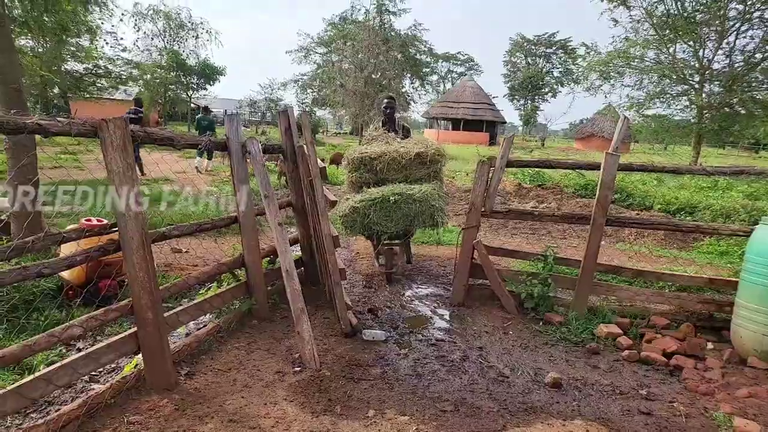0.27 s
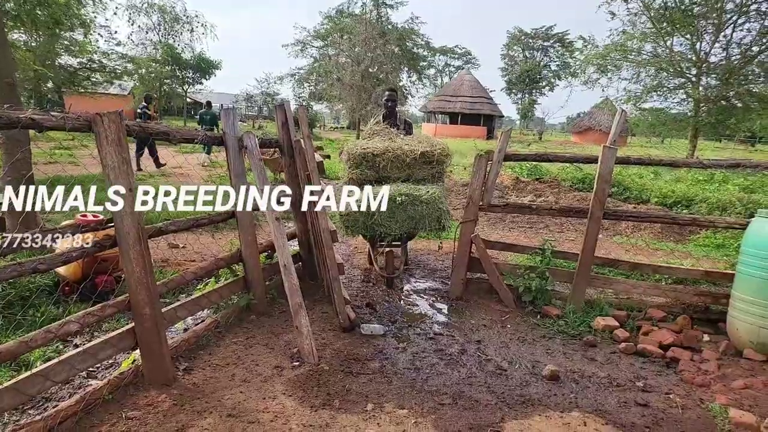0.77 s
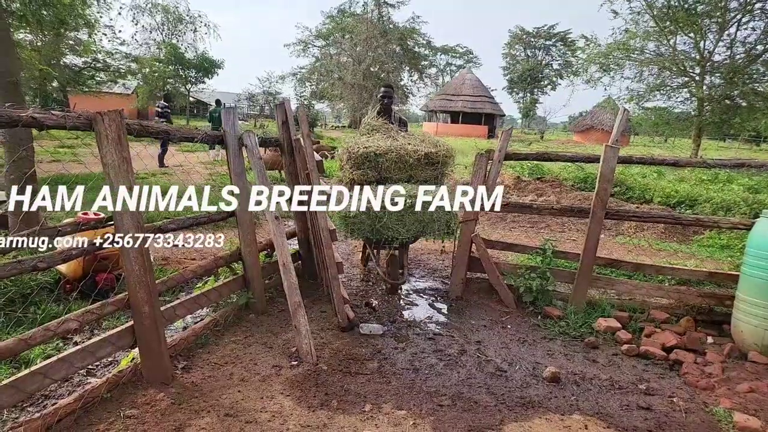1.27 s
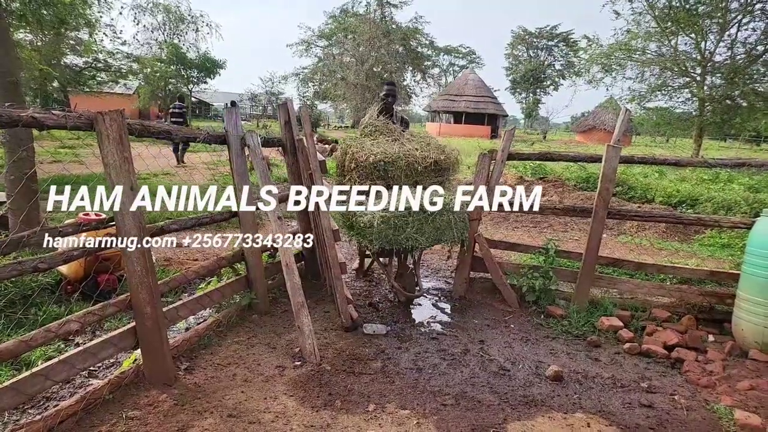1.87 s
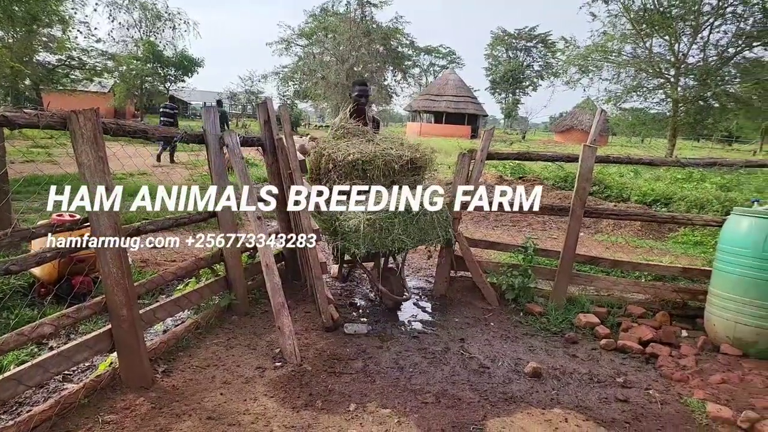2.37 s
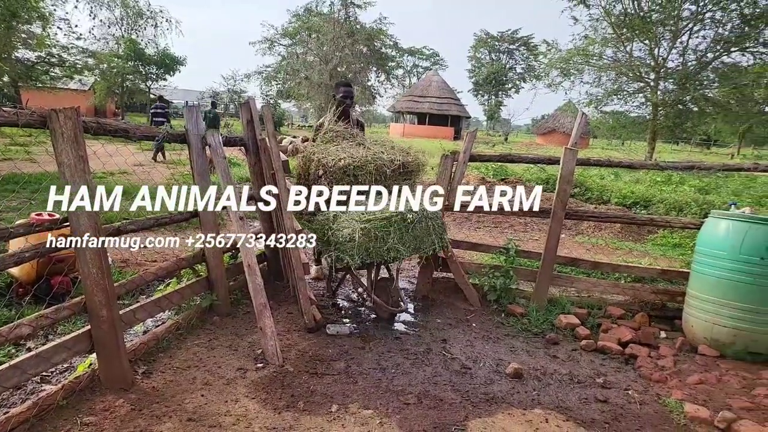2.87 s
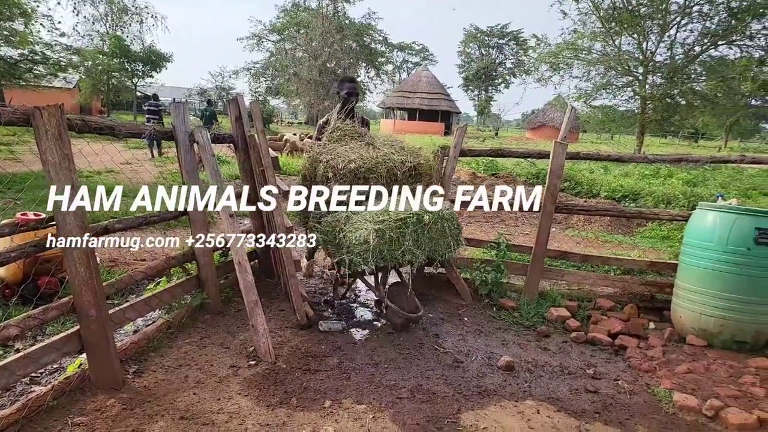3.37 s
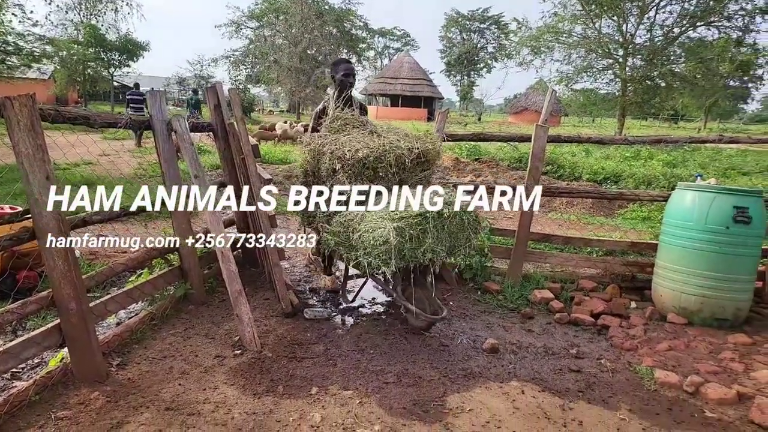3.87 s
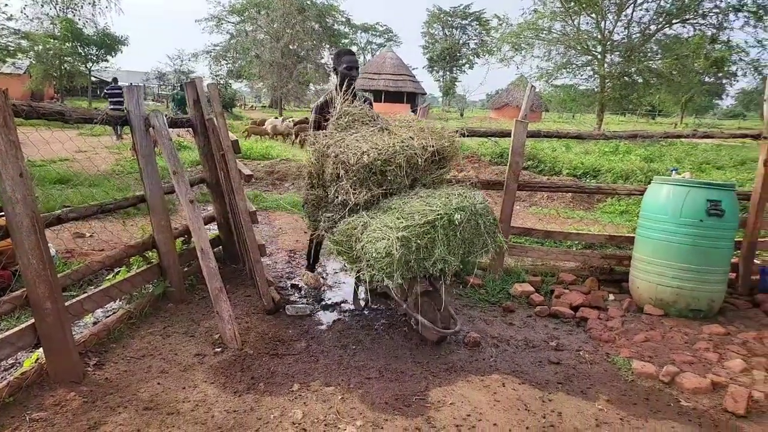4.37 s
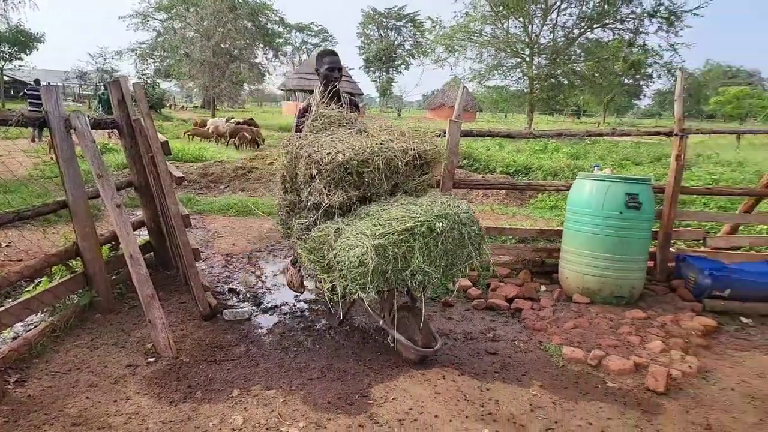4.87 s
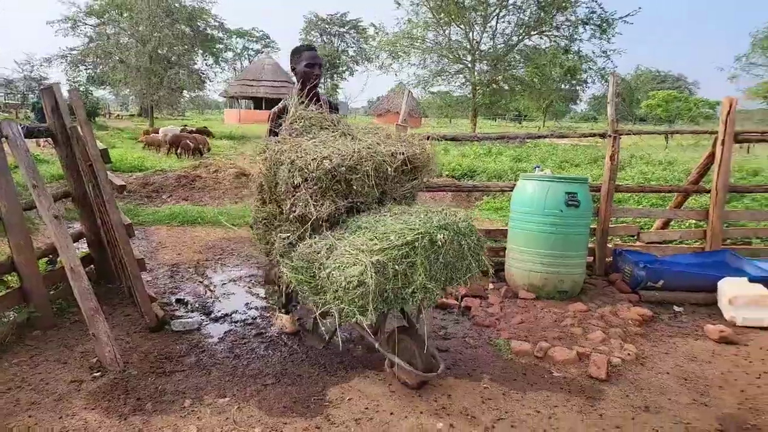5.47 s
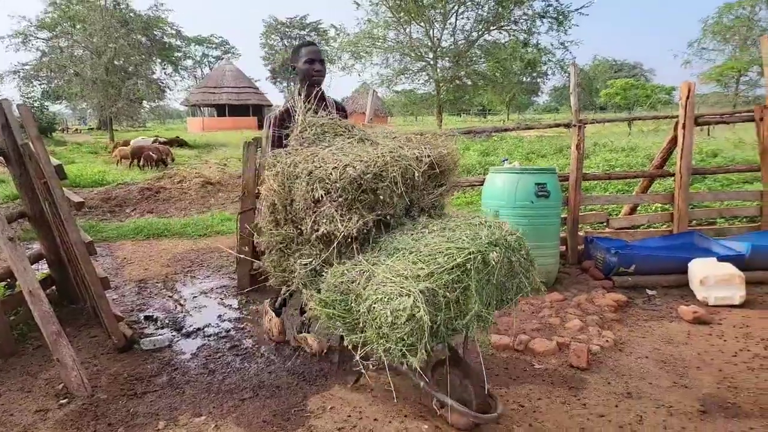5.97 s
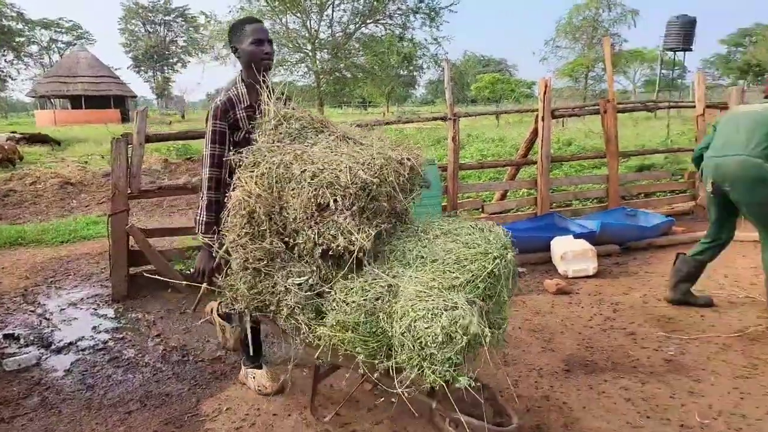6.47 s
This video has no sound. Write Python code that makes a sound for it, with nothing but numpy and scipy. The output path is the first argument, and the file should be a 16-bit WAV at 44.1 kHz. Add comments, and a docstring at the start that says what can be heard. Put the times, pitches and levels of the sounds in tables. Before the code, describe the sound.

Faint, blurred bird chatter with a few nearer whistles sits over gusty low air. A barrow's tyre crunches gently and grows nearer; jolts give metallic rattles followed by dull booms. Wet hollow footsteps come in the second half, then crackling stalks, a double hollow bump, scraping dirt and fizzing straw close to the handheld microphone, with small squeaks, a soft wind buffet and a last sharp chip.

```python
"""Small birds chatter in the trees over a low, gusty breeze, a few of them nearer than the rest.
A loaded wheelbarrow comes closer over a muddy farmyard: its frame clanks, its tray booms, boots plop, stalks snap.
Then, close by on the right, a load lands with a hollow thud and slides grittily, with fizzing straw and thin squeaks.
Whistles are gliding tones, blows are sets of fading tones, and dirt, straw and leaves are showers of tiny clicks."""
import sys
import numpy as np
from scipy import signal
from scipy.fft import rfft, irfft, next_fast_len
from scipy.io import wavfile
from scipy.ndimage import uniform_filter1d

SR = 44100
rng = np.random.default_rng(int(sys.argv[2]) if len(sys.argv) > 2 else 0)


def transcribe(u):
    """Save the signal u as a 16-bit wav file named by the first command-line argument.

    u: samples, shape (n,) or (channels, n), limited to [-1, 1]; the rate is SR.
    q: integer samples, one column per channel.
    """
    v = np.clip(np.atleast_2d(u).T, -1, 1)
    q = np.round(v * 32767).astype(np.int16)
    wavfile.write(sys.argv[1], SR, q)


N = 296352
TIME = np.arange(N) / SR
HIT = TIME[:SR // 2]  # the half second given to each blow


def undb(db):
    """Decibels to gain."""
    return 10 ** (np.asarray(db) / 20)


def unit(x):
    """Scale to rms 1."""
    return x / np.sqrt(np.mean(x ** 2))


def peak(x):
    """Scale to peak 1."""
    return x / np.max(np.abs(x))


def fade(t60):
    """Dying away of a blow: down 60 dB after t60 seconds."""
    return np.exp(-np.log(1000) * HIT / max(t60, .003))


def curve(rows):
    """Every column of a table as a line through time."""
    s, *columns = np.transpose(rows)
    return [np.interp(TIME, s, c) for c in columns]


def colour(x, points):
    """Filter by a spectrum of (f/Hz, level/dB) points."""
    hz, db = np.transpose(points)
    size = next_fast_len(x.shape[-1] + SR // 20)
    f = np.maximum(np.fft.rfftfreq(size, 1 / SR), 1)
    gain = undb(np.interp(np.log(f), np.log(hz), db))
    return irfft(rfft(x, size) * gain, size)[..., :x.shape[-1]]


def ring(modes):
    """Fading tones of a struck body, slightly detuned at every blow."""
    out = 0
    for hz, db, t60 in modes:
        detuned_hz = hz * (1 + 0.0097 * rng.standard_normal())
        out = out + undb(db) * fade(t60) * np.sin(2 * np.pi * detuned_hz * HIT)
    return out


def favour(modes, hz, focus_db):
    """Weaken each mode by focus_db times its squared distance from hz in octaves."""
    return [(f, db - focus_db * np.log2(f / hz) ** 2, t60) for f, db, t60 in modes]


def grains(rate, spread_db):
    """Random tiny clicks, about rate per second; a larger spread_db makes their sizes more unequal."""
    sizes = undb(spread_db * np.minimum(rng.exponential(size=N), 5)) * rng.standard_normal(N)
    return sizes * (rng.random(N) < rate / SR)


def walk(rate):
    """Slow random wandering with a spread near 1."""
    k = int(SR / rate)
    steps = np.repeat(rng.standard_normal(N // k + 1), k)
    return unit(uniform_filter1d(uniform_filter1d(steps, k), k)[:N])


def swell(s, attack_s, hold_s, release_db_per_s):
    """Envelope that rises at time s, holds and dies away."""
    age = TIME - s
    release = undb(-release_db_per_s * np.maximum(age - attack_s - hold_s, 0))
    return np.clip(age / attack_s, 0, 1) * release


def place(x, pan_db=0, lag_ms=0):
    """Two ports: a left minus right level difference, and the left one hears later."""
    n = np.arange(len(x))
    left = np.interp(n - round(lag_ms * SR / 1000), n, x, left=0)
    return np.array([left * undb(pan_db / 2), x * undb(-pan_db / 2)])


def add(out, s, x):
    """Mix a sound in at time s."""
    i = max(int(s * SR), 0)
    out[:, i:i + x.shape[-1]] += x[..., :max(N - i, 0)]


def yard(x, t60, wet_db):
    """Trees and fences scatter a thin diffuse tail."""
    tail = rng.standard_normal((2, len(HIT))) * fade(t60) * (1 - np.exp(-HIT / 0.0025))
    tail /= np.sqrt(np.sum(tail ** 2, axis=1, keepdims=True))
    return x + undb(wet_db) * signal.fftconvolve(x, tail, axes=1)[:, :N]


def chirp(length, start_hz, end_hz, waver=0.0085, flutter=0.33):
    """A gliding whistle whose pitch and strength flutter."""
    u = np.linspace(0, 1, int(max(length, .01) * SR))
    wobble, tremble = (np.interp(u, np.linspace(0, 1, 18), r) for r in rng.standard_normal((2, 18)))
    hz = (start_hz + (end_hz - start_hz) * u) * (1 + waver * wobble)
    strength = np.abs(np.sin(np.pi * u)) ** 0.97 * (1 + flutter * tremble)
    return np.sin(2 * np.pi * np.cumsum(hz) / SR) * strength


def slur(length, hz, glide):
    """A whistle that glides around its middle pitch at so many octaves a second."""
    half = 2 ** (glide * length / 2)
    return chirp(length, hz / half, hz * half)


# spectrum of the colony: f/Hz, level/dB
COLONY_COLOUR = [(710, -32), (1200, -13.5), (1620, -12), (1800, -6.5), (2050, -5), (2860, -2.5),
                 (3080, -2.5), (3700, -4), (4620, -2), (5200, -6), (5850, -3), (8510, -24), (11700, -21),
                 (15500, -24.5)]
# loudness of the colony, before gain_db is added: t/s, level/dB
COLONY_LEVEL = [(.16, -52), (2.4, -51), (3.2, -53), (4.6, -52.5), (5.4, -51.5), (6.72, -50)]
# slurred notes against the wash: t/s, level/dB
CHATTER = [(.16, .5), (2.7, -.5), (3.6, -4.5), (6.72, -4.5)]


def colony(count=1000, centre_hz=3850, range_octaves=.36, wash_db=0, gain_db=1.5):
    """Many far slurred notes, blurred by the trees, over a wash of buzzing calls and leaves that later leads."""
    notes = np.zeros((2, N))
    starts = rng.uniform(0, N / SR, count)
    traits = np.clip(rng.standard_normal((count, 6)), -1.7, 1.7)
    for s, (pitch, slope, size, length, pan, lag) in zip(starts, traits):
        hz = centre_hz * 2 ** (range_octaves * pitch)
        # notes last about a twentieth of a second and mostly fall
        end_hz = hz * np.exp(.1 * slope - .06)
        note = chirp(.058 * np.exp(.3 * length), hz, end_hz, waver=.009, flutter=.45)
        add(notes, s, place(note * undb(2 * size), 3.1 * pan, .14 + .08 * lag))
    wash = np.array([unit(grains(rate=16000, spread_db=3.0)) * undb(1.3 * walk(45)) for _ in range(2)])
    notes = unit(colour(yard(notes, t60=.3, wet_db=-5), COLONY_COLOUR))
    wash = unit(colour(wash, COLONY_COLOUR))
    chatter, hush = undb(curve(CHATTER)[0]), undb(wash_db)
    # the hypotenuse keeps the overall level steady while the balance shifts
    voices = (chatter * notes + hush * wash) / np.hypot(chatter, hush)
    return voices * undb(curve(COLONY_LEVEL)[0] + gain_db)


# spectrum of the breeze: f/Hz, level/dB
AIR = [(20, -17), (50, -3), (80, 2.5), (115, -1), (170, -7.5), (300, -17.5), (700, -26.5), (2000, -47),
       (8000, -68)]
# spectrum of the rolling tyre's crunch: f/Hz, level/dB
CRUNCH = [(80, -5), (200, 0.5), (400, 1), (800, -2.5), (1400, 1.5), (2500, -39), (5000, -33), (12000, -47)]
# spectrum of crushed clods: f/Hz, level/dB
CLOD_COLOUR = [(80, -7), (200, 2.5), (400, -1), (800, -6.5), (1400, -3.5), (2500, -5.5), (5000, -51),
               (12000, -52)]
# clods crushed on the way: t/s, hold/s, level/dB
CLODS = [(0.64, 0.027, -59), (1.968, 0.038, -51.5), (2.597, 0.012, -53), (2.777, 0.0098, -49.5),
         (2.825, .015, -62)]
CLOD_ATTACK_S, CLOD_RELEASE_DB_PER_S = 0.01, 193
# the barrow comes nearer at a walking pace; the tyre's level is given at 1 m
START_M, SPEED_M_S, TYRE_DB = 7.78, 0.9, -49.5


def ground(air_db=-63.5, air_side_db=-7, shared=0.96, uneven_db=3):
    """Low gusty breeze; the tyre's uneven crunch, growing as it nears; dull crumbling clods."""
    mid, side = (unit(colour(rng.standard_normal(N), AIR)) for _ in range(2))
    gusts_db = 2.2 * walk(9)
    air = (mid + undb(air_side_db) * np.array([side, -side])) * undb(air_db + gusts_db)
    # one stream of clicks reaches both ports, and each port adds its own
    grit = [grains(rate=600, spread_db=1.2) for _ in range(3)]
    crumbs = shared * place(grit[0], 0, 0.42) + np.array(grit[1:])
    distance_m = np.maximum(START_M - SPEED_M_S * TIME, 1)
    rolling = unit(colour(crumbs, CRUNCH)) * undb(TYRE_DB + uneven_db * walk(25.1)) / distance_m
    crushing = sum(undb(db) * swell(s, CLOD_ATTACK_S, hold, CLOD_RELEASE_DB_PER_S) for s, hold, db in CLODS)
    return air + rolling + unit(colour(crumbs, CLOD_COLOUR)) * crushing


# ringing modes of the steel frame: f/Hz, level/dB, t60/s
FRAME = [(465, 2.5, 0.12), (821, -8.5, 0.29), (993.5, 1, 0.21), (1060, 7, 0.088), (1270, 7.5, 0.066),
         (1448, 7, 0.058), (1560, -4, 0.14), (1757, -2, 0.15), (1857, 5, 0.11), (1907, 10, 0.047)]
# spectrum of the chattering contacts: f/Hz, level/dB
CLANK_COLOUR = [(200, -35), (450, -2), (750, -4), (1000, -8), (1400, 5), (1850, -6), (2200, -3), (3000, -5),
                (6000, -47), (12000, -48)]
# the wheel drops into a rut, the frame clanks, then the tray booms:
# t/s, clank level/dB, boom lag/s, boom level/dB, boom f/Hz
JOLTS = [(.156, -41.5, 0, -70, 150), (1.629, -44.5, 0.018, -31.5, 165), (1.776, -47, 0.016, -41.5, 150),
         (1.835, -49.5, 0.005, -34, 101), (1.886, -49.5, 0.008, -38.5, 90),
         (2.468, -42.5, 0.0048, -32.5, 147.4), (2.898, -51, 0.0013, -40, 224),
         (3.110, -30, 0.00061, -36, 151), (3.117, -31, .014, -22.5, 150), (3.141, -41, 0.016, -30, 194),
         (3.485, -46.5, 0.0033, -36.5, 98), (3.646, -50, 0.012, -42, 130),
         (4.297, -42.5, 0.0012, -41.5, 160), (5.432, -40.5, 0.018, -25.5, 164),
         (5.628, -45, .006, -38.5, 196), (5.719, -63, 0.013, -33.5, 171), (6.325, -36, 0.002, -24, 120),
         (6.338, -36, 0.0057, -27.5, 162), (6.483, -64, 0.0007, -35, 181), (6.543, -52, 0.0015, -27.5, 245),
         (6.557, -30.5, 0.0093, -25.5, 154)]
# soft jolts rattle on, hard ones are crisp: t60 halves for every RATTLE_HALVING_DB louder
RATTLE_T60_S, RATTLE_AT_DB, RATTLE_HALVING_DB = 0.083, -36, 18.5
CLANK_PAN_DB = 3.5  # left minus right


def frame(ring_db=-5, scatter=0.96, build=0.32):
    """Loose steel parts chatter briefly and ring the frame; a longer rattle builds up more slowly."""
    out = np.zeros((2, N))
    for s, db, *_ in JOLTS:
        t60 = RATTLE_T60_S * 2 ** ((RATTLE_AT_DB - db) / RATTLE_HALVING_DB)
        noise = rng.standard_normal((3, len(HIT)))
        contacts = (noise[0] + scatter * noise[1:]) * fade(t60) * (1 - fade(build * t60))
        rung = signal.fftconvolve(contacts, ring(FRAME)[None], axes=1)[:, :len(HIT)]
        clank = unit(unit(colour(contacts, CLANK_COLOUR)) + undb(ring_db) * unit(rung))
        sides_db = np.array([[CLANK_PAN_DB], [-CLANK_PAN_DB]]) / 2
        add(out, s, peak(clank) * undb(db + sides_db))
    return yard(out, t60=0.093, wet_db=-2.5)


# ringing modes of the steel tray under its load: f/Hz, level/dB, t60/s
TRAY = [(78, -12, .12), (104, -7, .15), (139, -2, .33), (160, -4, .17), (184, -3, .17), (225, -3.5, .27),
        (252, -8, .17)]
# ring of the tray against the tyre's bounce: less on hard blows (slope in dB per dB)
BOOM_RING_DB, BOOM_AT_DB, BOOM_RING_SLOPE = -3, -36, -0.26


def tray(push_s=0.0075, focus_db=4, build_s=0.034, stiff=0.14):
    """The tyre bounces for a few cycles, sinking in pitch as it relaxes, and shakes the tray's low modes."""
    out = np.zeros((2, N))
    for s, _, lag_s, db, hz in JOLTS:
        squash = np.exp(-HIT / push_s)
        bounce_hz = hz * (1 + stiff * (squash - .5))
        bounce = peak(HIT * squash * np.sin(2 * np.pi * np.cumsum(bounce_hz) / SR))
        # modes near the bounce rate take most of the energy
        boom = peak(ring(favour(TRAY, hz, focus_db)) * (1 - fade(build_s)))
        ring_db = BOOM_RING_DB + BOOM_RING_SLOPE * (db - BOOM_AT_DB)
        add(out, s + lag_s, place(undb(db) * peak(bounce + undb(ring_db) * boom)))
    return out


# nearer birds' whistles: t/s, middle f/Hz, glide/(octaves per s), level/dB
CHIRPS = [(.2, 3620, 1.5, -51), (.256, 3840, -2.5, -49.5), (.266, 3420, 1.5, -49), (.342, 4000, -.5, -55),
          (.355, 4540, 0, -52), (.447, 4600, -3, -51), (.86, 3620, 0, -53), (.99, 3640, -1.5, -53.5),
          (.99, 2570, 1, -58), (1.01, 4660, 0, -55), (1.252, 3340, 3, -52), (1.321, 2905, 0.5, -46.5),
          (1.462, 3630, -0.2, -49.5), (1.477, 4085, -1.5, -48), (2.172, 3820, -2, -63),
          (2.312, 4080, 2.5, -55.5), (2.38, 3550, 2, -54), (2.532, 4480, -2, -48), (2.59, 2790, 0, -53),
          (2.64, 3600, -1, -59), (2.71, 4150, -2, -50), (3.342, 4320, .5, -57.5), (3.425, 4730, -1, -61),
          (3.78, 4320, -1.5, -59), (4.325, 3480, 2, -52.5), (4.458, 3616, -0.1, -45.5),
          (4.619, 4650, 0.5, -48), (5.073, 3600, -1.5, -42.5), (5.226, 3330, -0.8, -41.5),
          (5.345, 4680, 0, -49.5), (5.588, 3820, -1.5, -50.5), (5.612, 3350, 0, -45),
          (5.772, 3600, 0.5, -52), (5.94, 4650, -1.5, -48.5), (6.343, 3610, -3, -39.5),
          (6.496, 4660, -1, -46.5)]
CHIRP_S = .056
# steep down-slurs: t/s, length/s, starting f/Hz
SWEEPS = [(0.782, .11, 5670), (1.659, 0.096, 5280), (1.835, 0.033, 4270), (2.025, 0.071, 4800),
          (2.895, .08, 4600), (3.066, 0.036, 4300)]
SWEEP_DB, SWEEP_FALL = -56.5, .63  # level; end pitch over starting pitch
# high up-slurs: t/s, level/dB
RISES = [(1.395, -53.5), (2.29, -55.5), (5.545, -48), (6.648, -49)]
RISE_HZ = 5430, 6430  # from, to
# a buzzy trill: t/s, length/s, f/Hz, beat f/Hz, level/dB before the beating
TRILL = .48, .16, 3570, 130, -49
# a sharp chip from both sides of one close bird's syrinx at once: f/Hz, glide/(octaves per s), level/dB
CHIP = [(4660, 0.5, -31.5), (3515, -8, -29)]
CHIP_AT_S, CHIP_S = 6.695, 0.012


def near_birds(pan_db=3):
    """Whistles, steep down-slurs, high up-slurs and a trill stand out of the chatter; one chip is close."""
    out = np.zeros((2, N))
    for s, hz, glide, db in CHIRPS:
        add(out, s, place(undb(db) * slur(CHIRP_S, hz, glide), pan_db))
    for s, length, hz in SWEEPS:
        add(out, s, place(undb(SWEEP_DB) * chirp(length, hz, hz * SWEEP_FALL), pan_db))
    for s, db in RISES:
        add(out, s, place(undb(db) * chirp(CHIRP_S, *RISE_HZ), pan_db))
    s, length, hz, beat_hz, db = TRILL
    note = chirp(length, hz, hz)
    beating = 1 + np.sin(2 * np.pi * beat_hz * TIME[:len(note)])
    add(out, s, place(undb(db) * note * beating, pan_db))
    for hz, glide, db in CHIP:
        add(out, CHIP_AT_S, place(undb(db) * slur(CHIP_S, hz, glide), pan_db))
    return yard(out, t60=0.23, wet_db=-4.5)


# hollow plops of boots in wet mud: t/s, level/dB, f/Hz, t60/s
PLOPS = [(1.982, -48, 379.5, 0.38), (2.012, -44, 344, 0.094), (2.167, -48.5, 384, 0.054),
         (4.303, -48, 258, 0.058), (4.873, -50, 405, 0.41), (4.91, -35, 340, 0.072),
         (4.954, -45.5, 250, 0.095), (5.435, -35, 283, 0.17), (5.444, -32, 483, 0.018),
         (5.593, -46.5, 355, 0.14), (5.628, -40.5, 264, 0.15), (5.722, -33, 380, 0.038)]
# spectrum of the squishing mud: f/Hz, level/dB
MUD_COLOUR = [(100, -4), (250, 19.5), (430, 8.5), (650, 4), (1000, 1), (1500, -50), (5000, -50)]


def boots(squish_db=-6, squish_t60=0.24, sag=0.7, pan_db=1):
    """A pocket of air rings under the sole, sinking in pitch, while mud squishes out."""
    out = np.zeros((2, N))
    for s, db, hz, t60 in PLOPS:
        pocket = np.sin(2 * np.pi * hz * HIT * (1 - sag * HIT)) * fade(t60) * (1 - fade(0.0097))
        noise = rng.standard_normal((2, len(HIT)))
        squish = colour(noise * fade(squish_t60) * (1 - fade(0.06)), MUD_COLOUR)
        add(out, s, undb(db) * (place(peak(pocket), pan_db) + undb(squish_db) * peak(squish)))
    return out


# hard single knocks on the frame: t/s, level/dB, centre f/Hz
KNOCKS = [(2.469, -35.5, 1153), (2.78, -46.5, 1450), (3.1094, -25, 1095), (3.116, -23.5, 1740),
          (3.1307, -24, 1214), (3.14, -37, 1920), (3.141, -34, 503), (5.441, -38, 788), (5.805, -39.5, 950),
          (5.98, -36, 1020), (6.324, -30.5, 1330), (6.545, -34, 1400), (6.551, -30.5, 1000)]


def knocks(strike_s=0.00118, focus_db=7, ring_db=-4.5, pan_db=3, lag_ms=0.19):
    """The frame hits its stop: one short blow, then the modes near its pitch ring on."""
    out = np.zeros((2, N))
    for s, db, hz in KNOCKS:
        strike = peak(HIT ** 2 * np.exp(-HIT / strike_s) * np.sin(2 * np.pi * hz * HIT))
        rung = peak(ring(favour(FRAME, hz, focus_db)) * (1 - fade(0.025)))
        add(out, s, place(undb(db) * peak(strike + undb(ring_db) * rung), pan_db, lag_ms))
    return yard(out, t60=0.2, wet_db=-17.0)


# stalks and grit snap: t/s, level/dB, centre f/Hz, t60/s
SNAPS = [(2.8469, -35, 3150, 0.035), (3.487, -36.5, 2200, 0.061), (4.3209, -36, 3390, .04),
         (5.4926, -35, 1910, 0.055), (5.719, -32.5, 2890, 0.043), (5.8212, -31.5, 5770, 0.12),
         (5.894, -34, 1200, 0.034), (5.903, -23, 4500, 0.022), (5.963, -32.5, 4580, 0.066),
         (6.007, -41, 2410, .03), (6.016, -22, 2670, 0.076), (6.033, -22.5, 3300, 0.051),
         (6.06, -23, 2300, 0.041), (6.087, -25, 3400, 0.049), (6.098, -23.5, 3100, 0.046),
         (6.332, -27, 2900, 0.077), (6.341, -37, 1300, 0.031), (6.348, -43, 2700, 0.034),
         (6.4352, -33, 2310, 0.064)]


def stalks(rise_s=0.0033, skirt_db=-10, top_db=-26):
    """Dry snaps, each a short broad crack of noise with little top."""
    out = np.zeros((2, N))
    for s, db, hz, t60 in SNAPS:
        fibres = rng.standard_normal((2, len(HIT))) * fade(t60) * (1 - fade(rise_s))
        spectrum = [(hz / 10, 2 * skirt_db), (hz / 3, -5), (hz, 0), (6500, skirt_db), (9000, top_db)]
        add(out, s, peak(colour(fibres, spectrum)) * undb(db))
    return out


# a thin, very high rising buzz: t/s, length/s, middle f/Hz, glide/(octaves per s), level/dB
BUZZES = [(4.55, .62, 9550, 0.16, -68.5), (5.06, 0.46, 12200, .2, -66)]


def high_buzz(width_hz=420):
    """A faint high whistle, roughened into a narrow band by slow noise."""
    out = np.zeros((2, N))
    for s, length, hz, glide, db in BUZZES:
        note = slur(length, hz, glide)
        noise = rng.standard_normal((2, len(note)))
        rough = unit(colour(noise, [(width_hz, 0), (4 * width_hz, -40)]))
        add(out, s, undb(db) * note * rough)
    return out


# the load scrapes over the dirt in separate shoves: t/s, hold/s, body level/dB, grit level/dB
SHOVES = [(5.715, 0.026, -45, -46), (5.78, 0.07, -44.5, -49), (5.89, .01, -49.5, -52),
          (5.971, 0.041, -31.5, -30), (6.048, 0.02, -48, -37.5), (6.134, 0.039, -41, -51.5),
          (6.197, 0.036, -47, -48), (6.26, 0.028, -44.5, -46), (6.424, 0.077, -48, -45.5),
          (6.524, 0.04, -46, -65)]
# the grit gives way just after the body moves
SHOVE_ATTACK_S, SHOVE_RELEASE_DB_PER_S, GRIT_LAG_S = 0.026, 120, 0.016
# the load lands and settles in hollow bumps: t/s, level/dB, f/Hz, t60/s
LANDING = [(5.721, -28.5, 429, 0.056), (5.8, -38, 362, 0.087), (5.987, -19.5, 363.5, 0.22),
           (6.014, -20, 371, 0.081), (6.144, -35, 303, 0.1)]
# hollow body of the load, as ringing modes: f/Hz, level/dB, t60/s
HOLLOW = [(367, 2.5, 0.16), (440, -4, 0.32), (623, -6, 0.25), (680, -5, 0.26), (1252, -3, 0.4)]
# spectrum of the body rubbing over the dirt: f/Hz, level/dB
SLIDE_BODY = [(25, -13), (55, 2), (100, 2), (220, 0), (320, -2), (450, -5), (700, -5.5), (900, -8.5),
              (1200, -6), (1600, -26), (3000, -55)]
# spectrum of the grit: f/Hz, level/dB
GRIT = [(400, -24), (1100, -3.5), (1700, -6.5), (2250, 4.5), (3300, 0), (4800, -9.5), (5900, -5.5),
        (7000, -22.5), (8500, -28.5), (15500, -22)]


def shove(s, hold, db):
    """One push of the sliding load: a quick rise, a hold and a steady dying away."""
    return undb(db) * swell(s, SHOVE_ATTACK_S, hold, SHOVE_RELEASE_DB_PER_S)


def load(lag_ms=0.45, body_pan_db=-1, scatter=0.38, hollow_db=-5, lumpy_db=1.5,
         knock_hz=1030, knock_db=-22, grit_shared=0.36):
    """A hollow thud to the right, then uneven grains of dirt and straw as the load slides."""
    # overlapping shoves add up as energy
    push = np.sqrt(sum(shove(s, hold, db) ** 2 for s, hold, db, _ in SHOVES))
    scrape = np.sqrt(sum(shove(s + GRIT_LAG_S, hold, db) ** 2 for s, hold, _, db in SHOVES))
    rubs = [unit(colour(grains(rate=900, spread_db=0.5), SLIDE_BODY)) for _ in range(3)]
    rung = unit(signal.fftconvolve(grains(rate=2500, spread_db=6.5), ring(HOLLOW))[:N])
    body = place(rubs[0] + undb(hollow_db) * rung, body_pan_db, lag_ms) + scatter * np.array(rubs[1:])
    grit = [unit(colour(grains(rate=1500, spread_db=0.0), GRIT)) for _ in range(3)]
    crunch = grit_shared * place(grit[0], 0, lag_ms) + 0.75 * np.array(grit[1:])
    # the load catches and slips, so body and grit surge together
    out = undb(lumpy_db * walk(80)) * (body * push + crunch * scrape)
    for s, db, hz, t60 in LANDING:
        thud = ring([(hz, 0, t60), (knock_hz, knock_db, t60 / 2)]) * (1 - fade(0.021))
        add(out, s, place(undb(db) * thud, body_pan_db, lag_ms))
    return out


STRAW = 5.998, 0.047, -48.5  # t/s, hold/s, level/dB


def straw():
    """Dry stalks fizz as the load comes down on them: dense clicks, strongest in the treble."""
    spectrum = [(3000, -15), (11000, -6)]
    fizz = np.array([unit(colour(grains(rate=9000, spread_db=4), spectrum)) for _ in range(2)])
    return fizz * shove(*STRAW)


# the sliding load squeaks thinly: t/s, length/s, f/Hz, level/dB
SQUEAKS = [(6.07, 0.16, 1185, -37.5), (6.2, 0.15, 1191, -40.5), (6.453, 0.058, 2367, -44)]


def squeaks(lag_ms=0.48):
    """Stick and slip hold one thin, trembling note."""
    out = np.zeros((2, N))
    for s, length, hz, db in SQUEAKS:
        note = chirp(length, hz, hz, waver=0.0046, flutter=0.43)
        add(out, s, place(undb(db) * note, 0, lag_ms))
    return out


# a puff of wind, mostly on the left port: start, peak level there, pitch, decay
PUFF_AT_S, PUFF_DB, PUFF_HZ, PUFF_T60_S = 6.264, -29, 75, 0.1


def puff(pan_db=14):
    """A single soft buffet of air: a low tone that swells and fades."""
    out = np.zeros((2, N))
    buffet = np.sin(2 * np.pi * PUFF_HZ * HIT) * fade(PUFF_T60_S) * (1 - fade(0.039))
    add(out, PUFF_AT_S, place(undb(PUFF_DB - pan_db / 2) * peak(buffet), pan_db))
    return out


def scene():
    """Barrow, boots and load in the open yard, under the birds."""
    work = frame() + tray() + boots() + knocks() + stalks() + load() + straw() + squeaks()
    return colony() + ground() + yard(work, t60=0.18, wet_db=-13.0) + near_birds() + high_buzz() + puff()


# tone difference between the two ports: f/Hz, left minus right level/dB
PORT_TILT = [(700, 0), (1500, 2.5), (2500, 3.5), (4000, 3), (5200, -1), (6500, -7), (9000, -5), (14000, 0)]
START_S, TOP_HZ = 0.1416, 15600  # end of the opening silence; top of the pass band


def record(dry):
    """The two ports colour the sound differently; it opens after a moment of silence and the top is cut."""
    ports = []
    for x, side in zip(dry, (1, -1)):
        ports.append(colour(x, [(hz, side * db / 2) for hz, db in PORT_TILT]))
    opened = np.clip((TIME - START_S) / .016, 0, 1)
    low_pass = signal.ellip(12, .2, 80, TOP_HZ, fs=SR, output="sos")
    return signal.sosfilt(low_pass, np.array(ports) * opened)


dry = scene()
out = record(dry)
transcribe(out)
```